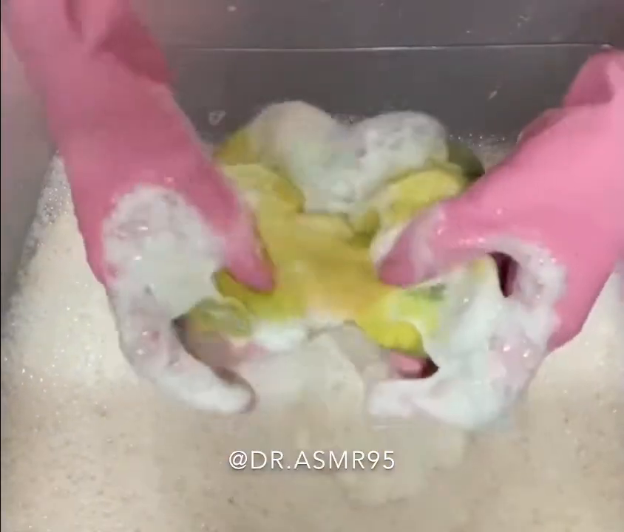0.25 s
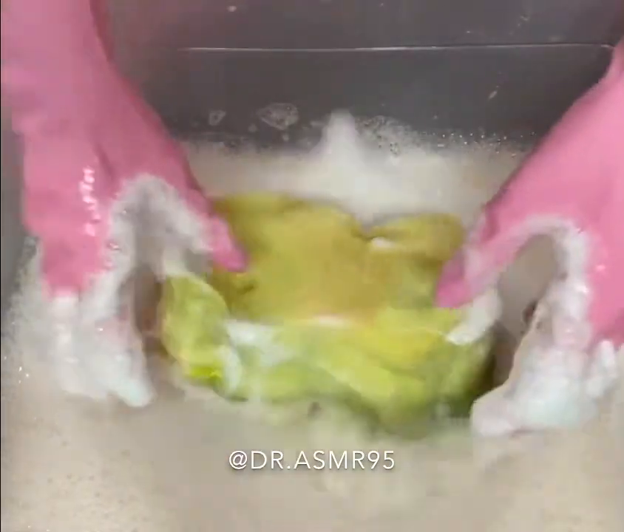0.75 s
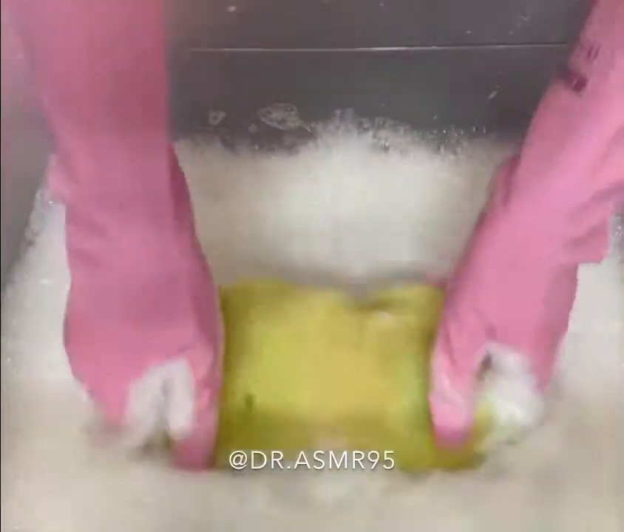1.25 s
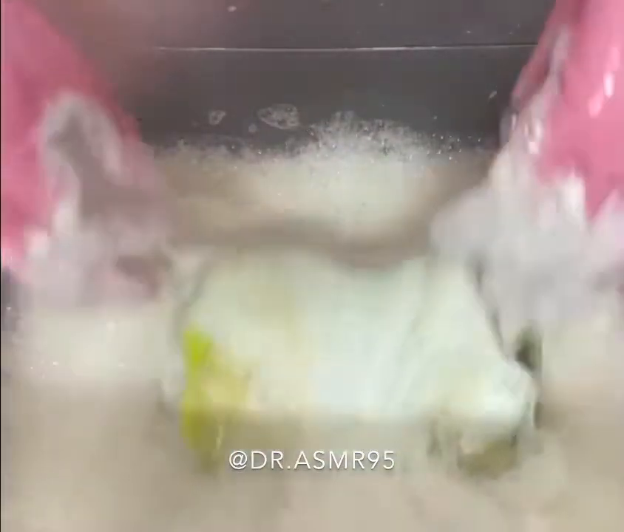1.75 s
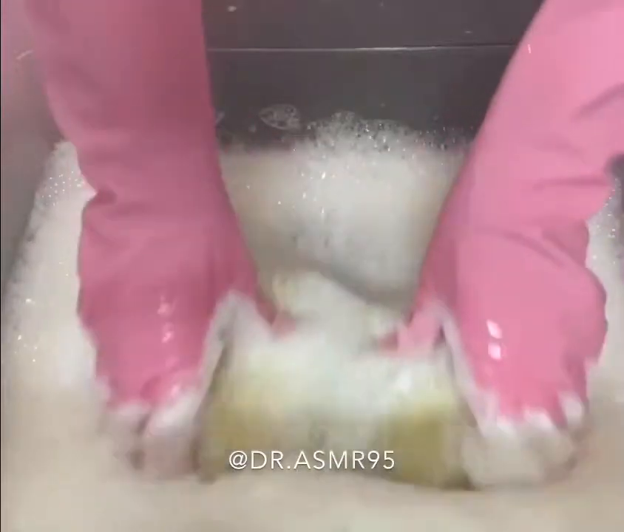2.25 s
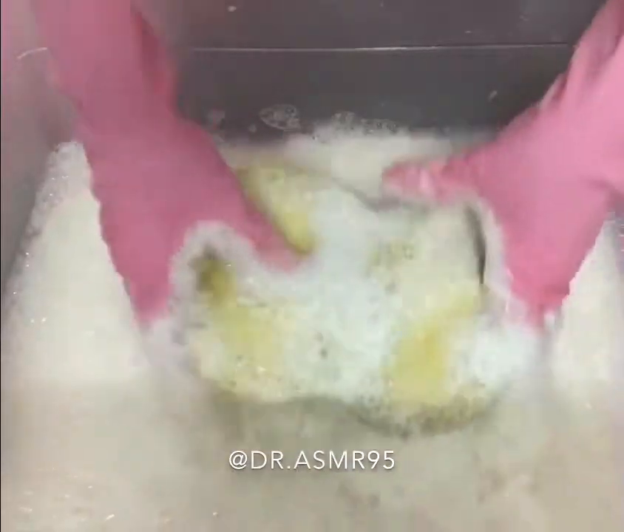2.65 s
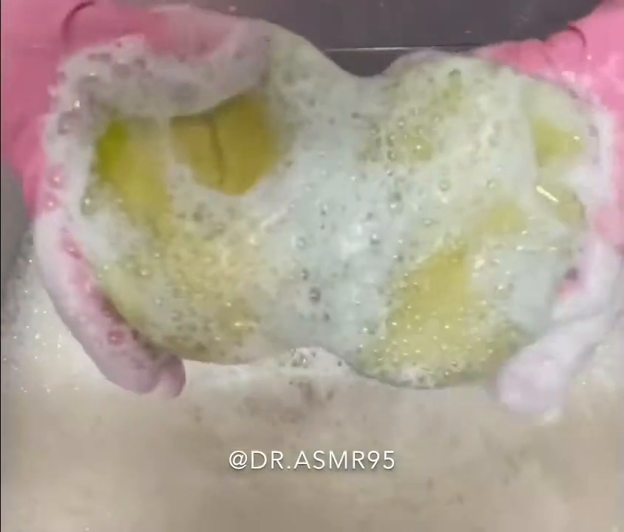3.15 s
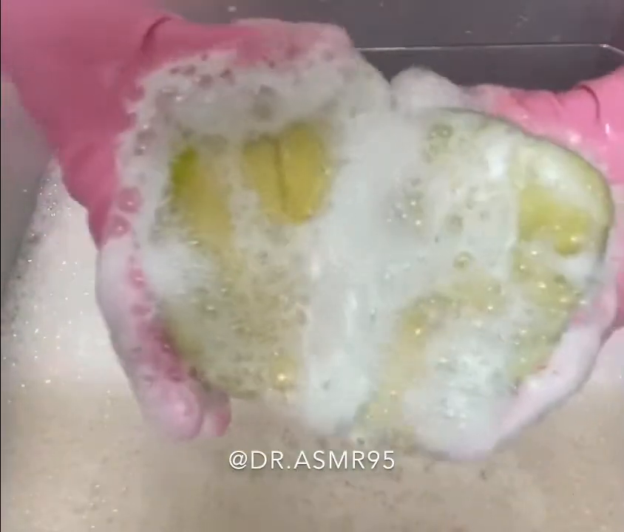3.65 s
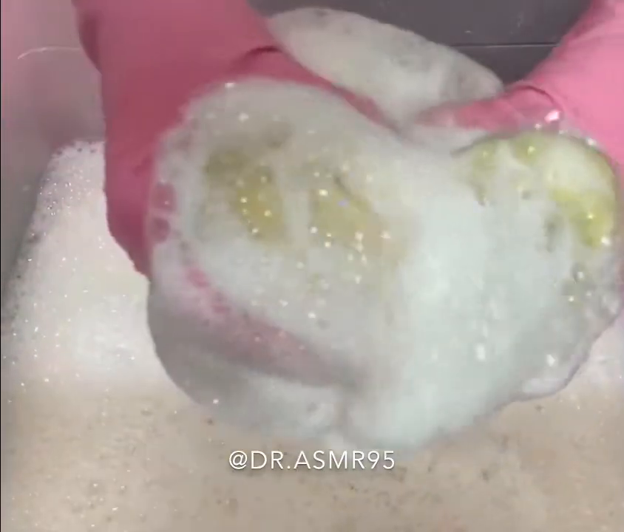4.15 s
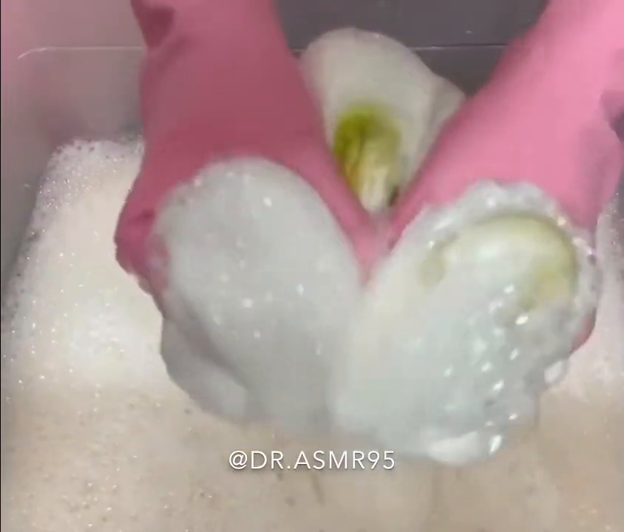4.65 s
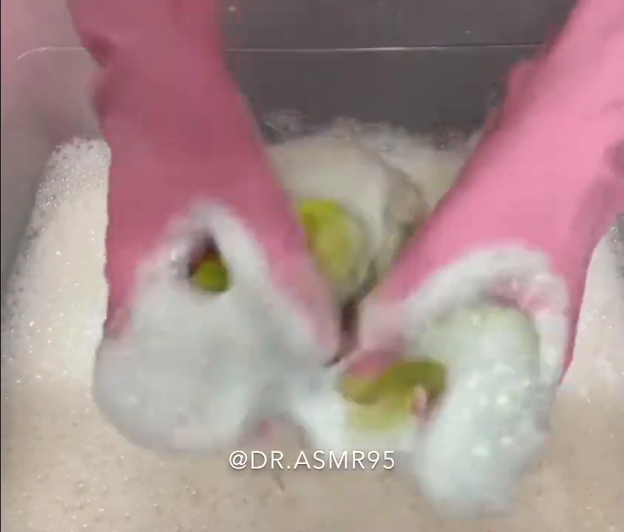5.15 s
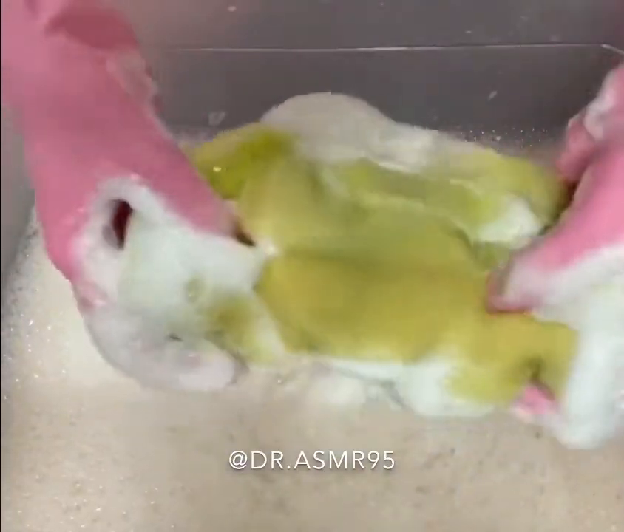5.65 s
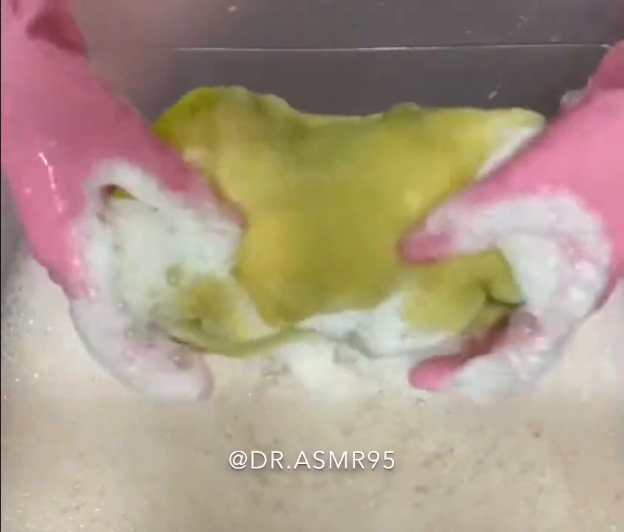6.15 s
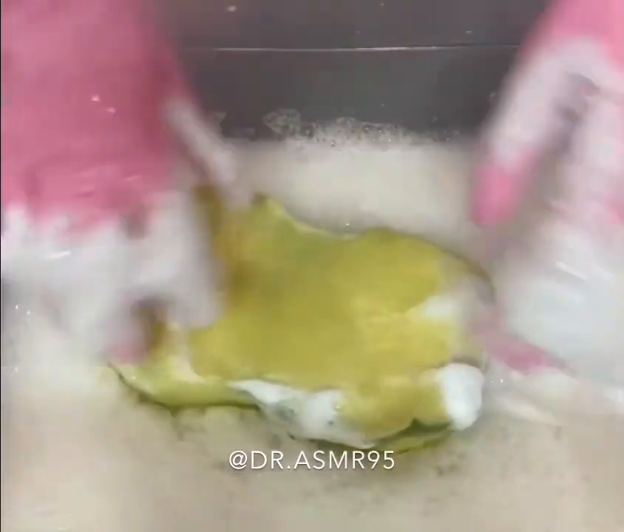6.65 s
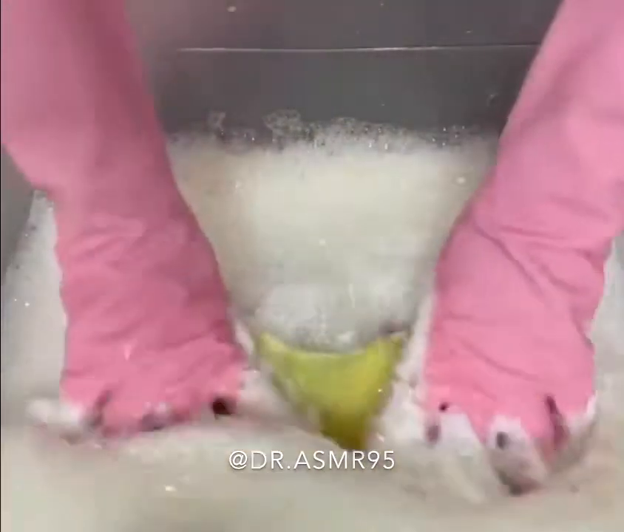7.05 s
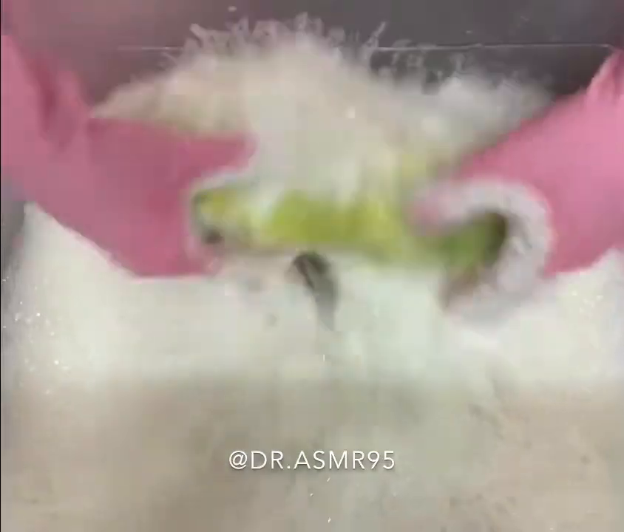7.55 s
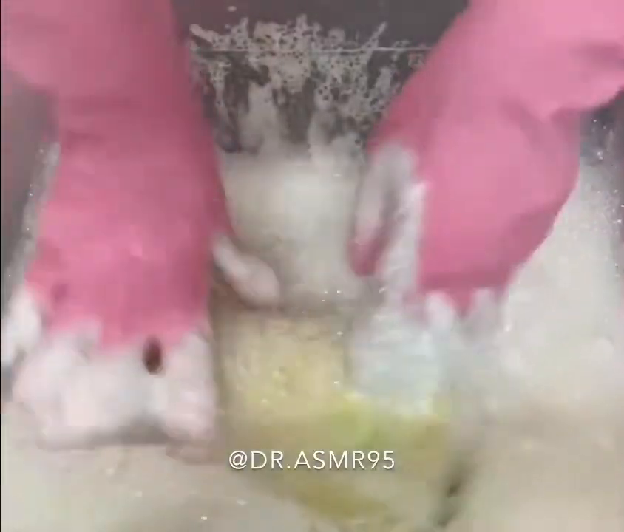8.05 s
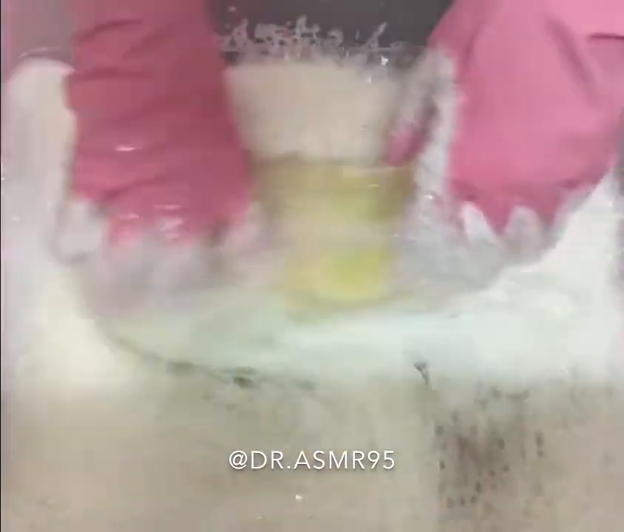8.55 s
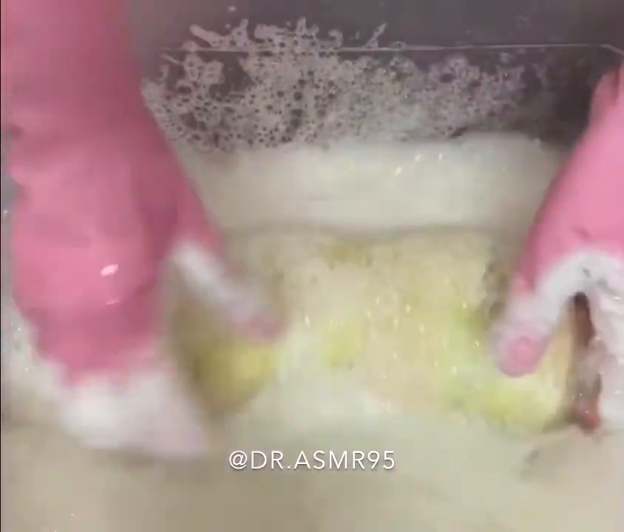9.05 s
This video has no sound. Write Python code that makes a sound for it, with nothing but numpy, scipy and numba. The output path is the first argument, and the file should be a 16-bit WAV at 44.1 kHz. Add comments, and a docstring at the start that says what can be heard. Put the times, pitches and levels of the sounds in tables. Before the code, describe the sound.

Very close stereo sound of a soapy sponge handled by rubber gloves in a small basin of foamy water, with short hard echoes and a faint low hum and hiss. From 0 to 0.7 s, bright fizzy presses and sloshing, with a burst of hollow blubs at about 0.5. From 1 to 3 s it is quieter: soft fizz, a fuller splash near 1.9, a faint rubber chirp at 2.4. From 3.1 the lather crackles coarsely with snapping films, swelling strongest around 3.8. From 4.2 to 4.7 trapped air sputters in a rapid buzzing flutter with low blubs. At 4.8 to 4.95 loud wet squirts slap out. Fizzy squeezes return at 5.4, 5.6 and 6.1, a deep gulping plop at 6.8, a splashy press at 7.2. From 7.5 to 9.3, softer sloshes, small blubs and sparse crackle.

```python
"""A soapy sponge is squeezed by gloved hands: lather crackles out of its pores as swarms of tiny ringing bubbles.
The hands push it around a sink of foamy water, close to the microphone; larger bubbles make the slosh.
Air pockets blub on falling notes, films snap as short noise bursts and wet gaps squirt as falling chirps.
In the hardest squeeze trapped air sputters out in a train of squirts over a drone.
Behind it lie the basin's short echoes and a room of filtered noise and low, wavering hum."""
import sys
import numpy as np
from scipy import signal
from scipy.fft import rfft, irfft, next_fast_len
from scipy.io import wavfile
from scipy.ndimage import uniform_filter1d
from numba import njit

SR = 44100
rng = np.random.default_rng(int(sys.argv[2]) if len(sys.argv) > 2 else 0)


def unload_wav(signal):
    """Save mono or channel-first audio to the path in sys.argv[1] as 16-bit WAV at rate SR, clipped to [-1, 1]."""
    wavfile.write(
        sys.argv[1],
        SR,
        np.round(np.clip(np.atleast_2d(signal).T, -1, 1) * 32767).astype(np.int16),
    )


N = 410130
TIME = np.arange(N) / SR
CLOCK = np.arange(0, N / SR + .002, .002)  # coarser time grid for the hand movements, s
FFT_SIZE = next_fast_len(N + 4096)
FREQ = np.fft.rfftfreq(FFT_SIZE, 1 / SR)
SLOSH_WIDTH, FOAM_WIDTH = .35, .4  # stereo spread of stirred water and of lather, 0-1


def amp(db):
    """Decibels to gain."""
    return 10 ** (np.asarray(db) / 20)


def evened(x):
    """Scales to rms 1."""
    return x / np.sqrt(np.mean(x ** 2) + 1e-20)


def shape(points):
    """Gain at every frequency, drawn through (frequency [Hz], level [dB]) points on a log axis."""
    hz, db = np.transpose(points)
    return amp(np.interp(np.log(FREQ + 1), np.log(hz + 1), db))


def filtered(x, response):
    """Applies a frequency response."""
    return irfft(rfft(x, FFT_SIZE) * response, FFT_SIZE)[..., :N]


def add(mix, s, sound):
    """Adds a sound into the mix at time s."""
    part = mix[..., max(round(s * SR), 0):][..., :sound.shape[-1]]
    part += sound[..., :part.shape[-1]]


def wander(size, per_s):
    """Random drift of rms 1, heading for a new value per_s times a second."""
    return evened(np.interp(np.arange(size) * per_s / SR, np.arange(size), rng.standard_normal(size)))


def band(x, hz, ratio):
    """A broad resonance from hz / ratio to hz * ratio."""
    b, a = signal.butter(1, [hz / ratio, hz * ratio], "band", fs=SR)
    return signal.lfilter(b, a, x)


def noise_burst(size, hz, ratio):
    """Noise of rms 1 through two equal resonances in a row."""
    return evened(band(band(rng.standard_normal(size), hz, ratio), hz, ratio))


@njit
def ring(out, start, hz, cycles, size, glide, pan):
    """Sums bubbles: each a sine that swells fast and dies, and whose pitch slides as it rings."""
    for k in range(len(start)):
        life = cycles[k] * SR / hz[k]
        for i in range(min(int(5 * life), out.shape[1] - start[k])):
            u = i / life
            swell = np.exp(-u) * np.tanh(2 * u)
            turns = cycles[k] * u * (1 + glide[k] * u)
            v = size[k] * swell * np.sin(2 * np.pi * turns)
            out[0, start[k] + i] += v * (1 + pan[k])
            out[1, start[k] + i] += v * (1 - pan[k])
    return out


def bubbles(colour, low_hz, high_hz, cycles, spread_db, clump_db, clumps_per_s, glide, width, count):
    """A swarm of bubbles of about rms 1: many small, a few large, bursting in clumps."""
    when, pitch, life, size, slide, side = rng.random((count, 6)).T
    start = (when * N).astype(np.int64)
    hz = low_hz * (high_hz / low_hz) ** pitch
    size_db = spread_db * np.minimum(-np.log(1 - size), 4)
    size_db += clump_db * wander(N, clumps_per_s)[start]
    gain = amp(size_db) * hz / low_hz
    pan = width * (2 * side - 1)
    swarm = ring(np.zeros((2, N)), start, hz, cycles * (.5 + life), gain, glide * slide, pan)
    swarm = filtered(swarm, shape(colour))
    # the hands set how much air escapes and the bubbles share it, so slow level changes are evened out
    power = uniform_filter1d(uniform_filter1d((swarm ** 2).mean(0), size=1800), size=1800)
    return swarm / np.sqrt(abs(power) + 1e-12)


def pops(drive, low_hz, high_hz, cycles, rise, spread_db, count):
    """Single bubbles that stand out of the swarm: each rings longer, and its note rises as it surfaces."""
    when, pitch, life, size, side = rng.random((count, 5)).T
    start = (when * N).astype(np.int64)
    hz = low_hz * (high_hz / low_hz) ** pitch
    gain = drive[start] * amp(spread_db * np.minimum(-np.log(1 - size), 3))
    pan = SLOSH_WIDTH * (2 * side - 1)
    return ring(np.zeros((2, N)), start, hz, cycles * (.5 + life), gain, rise * life, pan)


def movements(table, rounding):
    """Swells each movement to its peak and away; returns level, colour and dB below the peak over time."""
    s, rise, fall, db, colour = np.transpose(table)[..., None]
    # rise and fall are the times to change by 10 dB; a greater rounding flattens the top
    below_db = 10 * np.maximum((s - CLOCK) / rise, (CLOCK - s) / fall) ** rounding
    return db - below_db, colour, below_db


def together(db, resting_db):
    """Gain over time of overlapping movements: their powers add to the resting level."""
    power = (amp(db) ** 2).sum(0) + amp(resting_db) ** 2
    return np.interp(TIME, CLOCK, np.sqrt(power))


# colour of the room's steady noise: (frequency [Hz], level [dB])
ROOM_COLOUR = [(20, -28), (35, -3), (55, 12.5), (80, 11), (115, 14), (170, -0.5), (300, -21), (700, -42),
               (1800, -17), (4000, -17), (8000, -17.5), (16000, -19.5)]
# partials of the room's hum: (frequency [Hz], rms level [dB])
HUM_PARTIALS = [(58, -51), (116, -55.5)]


def room(noise_db=-50, apart=0.028):
    """Low rumble and faint hiss, nearly alike on both sides, under a hum whose phase wavers."""
    noise = rng.standard_normal(N) + apart * rng.standard_normal((2, N))
    hum = np.zeros(N)
    for hz, db in HUM_PARTIALS:
        hum += amp(db) * np.sqrt(2) * np.sin(2 * np.pi * hz * TIME + 0.68 * wander(N, 5))
    return amp(noise_db) * evened(filtered(noise, shape(ROOM_COLOUR))) + hum


# colour of the basin's echoes: (frequency [Hz], level [dB])
ECHO_COLOUR = [(80, -16), (250, -12), (600, -6.5), (1400, -12), (3000, -9), (6000, -13), (16000, -16)]


def sink(x, t60=0.089):
    """The basin walls throw back a short scatter of echoes, different on each side, gone 60 dB in t60 s."""
    t = np.arange(SR // 4) / SR
    struck = rng.random((2, len(t))) < .08
    taps = rng.standard_normal((2, len(t))) * struck * (t > .002) * amp(-60 * t / t60)
    taps /= np.linalg.norm(taps, axis=1, keepdims=True)
    echoes = signal.fftconvolve(x, taps, axes=1)[:, :N]
    return x + filtered(echoes, shape(ECHO_COLOUR))


# strokes through the water: (peak time [s], rise [s per 10 dB], fall [s per 10 dB],
# splash drive [dB], heave drive relative to splash drive [dB])
WATER_STROKES = [(.02, 0.13, 0.085, -35, -9.5), (.41, 0.22, 0.13, -36, -17), (.54, 0.046, 0.036, -35, -1.5),
                 (.94, 0.1, 0.15, -38.5, -5.5), (1.135, 0.04, 0.14, -39.5, -9.5),
                 (1.53, 0.24, 0.091, -38.5, -7.5), (1.885, 0.054, 0.08, -32, -7.5),
                 (1.96, 0.082, 0.23, -48.5, 4), (2.38, 0.28, 0.24, -44.5, -1.5),
                 (2.56, 0.22, 0.27, -42, -13), (2.82, 0.048, 0.2, -50, -1.5),
                 (3.08, 0.13, 0.15, -45.5, -7.5), (3.49, 0.26, 0.058, -43.5, -3.5),
                 (3.93, 0.24, 0.14, -32, -9.5), (4.26, 0.068, 0.23, -33.5, 0), (4.6, 0.1, .045, -31.5, -5),
                 (4.777, 0.0067, .04, -36, -10), (4.835, 0.035, 0.023, -31.5, -1.5),
                 (4.91, 0.06, 0.087, -28, -6.5), (5.4, 0.072, 0.093, -34, -12),
                 (5.62, 0.068, 0.15, -36, -4.5), (5.945, 0.2, 0.076, -39.5, -11),
                 (6.11, 0.02, 0.09, -31, -25), (6.26, 0.06, 0.025, -37.5, 0.5),
                 (6.585, 0.044, 0.065, -43.5, -1.5), (6.69, 0.041, 0.14, -34.5, -12),
                 (6.835, 0.092, 0.086, -34.5, -0.5), (7.0, 0.31, 0.2, -38, -14),
                 (7.21, 0.037, 0.11, -30, -8), (7.44, 0.15, 0.095, -33, -7), (7.73, 0.044, 0.1, -41, -5.5),
                 (8.17, 0.16, 0.1, -41, -4.5), (8.33, 0.067, 0.11, -38.5, -7),
                 (8.42, 0.088, 0.029, -41, -3), (8.73, 0.072, 0.052, -44, 3.5),
                 (9.03, 0.068, 0.059, -35.5, -1), (9.29, 0.13, 0.056, -41, -5)]


def stirring(rounding=1.08, ripple_db=-61):
    """How hard the strokes drive splash and heave, down to the ripple of water left alone."""
    db, depth, _ = movements(WATER_STROKES, rounding)
    return together(db, ripple_db), together(db + depth, ripple_db)


# colour of the splash bubbles: (frequency [Hz], level [dB])
SPLASH_COLOUR = [(100, -6), (200, -3.5), (350, 3), (500, -1), (650, -3.5), (800, -1.5), (1100, -12),
                 (1800, 0.5), (4000, -43)]
# colour of the deep heave bubbles: (frequency [Hz], level [dB])
HEAVE_COLOUR = [(30, -2), (70, 0), (110, -1), (180, -5.5), (260, -1.5), (500, -19)]


def water(splashing, heaving):
    """Larger bubbles open in the stirred water over the slow heave of the sponge."""
    splash = bubbles(SPLASH_COLOUR, 198.7, 1448, cycles=2.67, spread_db=1.5, clump_db=-0.5,
                     clumps_per_s=26, glide=-0.023, width=SLOSH_WIDTH, count=7500)
    heave = bubbles(HEAVE_COLOUR, 73.8, 258, cycles=1.09, spread_db=1.0, clump_db=-5.0,
                    clumps_per_s=21, glide=-0.0056, width=0.59, count=1200)
    return splash * splashing + amp(4.0) * heave * heaving


# air pockets opening: (time [s], level [dB], pitch at the top of the swell [Hz], swell time [s])
AIR_POCKETS = [(.514, -17, 830, 0.0048), (.520, -10.5, 664, 0.0021), (.523, -9.5, 298, 0.0024),
               (.526, -13, 540, 0.0039), (.536, -10, 308, 0.0025), (.557, -27, 420, 0.0029),
               (.908, -33, 519, 0.0083), (0.927, -24, 324, .0045), (.945, -25, 94, .013),
               (.972, -34, 560, .0025), (1.15, -34, 720, 0.0032), (1.52, -27.5, 850, 0.0027),
               (1.559, -30, 680, .003), (1.577, -31, 750, 0.0032), (1.715, -31, 340, 0.0039),
               (1.862, -24.5, 306, 0.0043), (2.134, -19, 268, 0.0031), (4.522, -22, 205, .0065),
               (4.55, -22, 750, 0.002), (4.569, -19, 362, 0.0049), (4.591, -14.5, 285, 0.0041),
               (4.61, -21, 798, .002), (4.615, -13, 238, .0052), (4.655, -12.5, 244.5, 0.0048),
               (4.803, -21.5, 620, 0.0018), (4.847, -17, 225, .0045), (5.783, -25.5, 1830, 0.0012),
               (5.811, -23.5, 1480, 0.0012), (6.081, -29, 890, .0026), (6.105, -23, 716, 0.0026),
               (6.226, -18, 410, 0.0036), (6.235, -23.5, 760, 0.0067), (6.243, -19.5, 306, 0.004),
               (6.277, -30.5, 170, 0.0066), (6.259, -26, 443, 0.0021), (6.3, -32, 397, 0.0035),
               (6.676, -31.5, 815, 0.0017), (6.785, -10.5, 199, .0044), (6.805, -18, 111, 0.012),
               (6.824, -18, 93, .0065), (6.856, -28, 80, .011), (6.882, -21.5, 796, 0.0034),
               (7.188, -23.5, 844, 0.0016), (7.424, -27, 482, 0.0085), (7.714, -31.5, 840, 0.0052),
               (7.73, -23, 300, 0.004), (8.319, -32, 794, 0.004), (8.75, -37.5, 854, 0.0038),
               (9.002, -25, 200, 0.0034), (9.016, -34, 393, .0041), (9.046, -25.5, 375, 0.0054)]


def blubs(fall=0.5, wobble=0.12, spatter_db=-15):
    """An air pocket swells open, so its note falls; its ragged rim spatters as noise around the note."""
    out, t = np.zeros(N), np.arange(SR // 10) / SR
    for s, db, pitch_hz, swell in AIR_POCKETS:
        u = t / swell
        note = pitch_hz * (1 + fall * (np.exp(-u) - np.exp(-1)))
        hz = note * (1 + wobble * wander(len(t), 813))
        tone = np.sin(2 * np.pi * np.cumsum(hz) / SR)
        spatter = noise_burst(len(t), note[0], 1.8)
        add(out, s, amp(db) * (u * np.exp(1 - u)) ** 1.85 * (tone + amp(spatter_db) * spatter))
    return out


# wet films snapping: (time [s], level before the shared trim [dB], pitch [Hz])
FILM_SNAPS = [(0.012, -23, 1900), (.432, -19, 9000), (.455, -22, 2020), (.519, -20.5, 1800),
              (.974, -34, 2200), (1.779, -30, 1000), (2.235, -29.5, 2060), (2.242, -32, 1900),
              (2.893, -34, 1880), (2.961, -35, 1640), (3.068, -27, 5100), (3.145, -28, 1240),
              (3.186, -26, 1680), (3.413, -24, 1900), (3.458, -24, 1750), (3.472, -21, 1680),
              (3.552, -24.5, 1830), (3.64, -22, 1130), (3.773, -29, 1330), (3.815, -22, 1670),
              (4.102, -29, 1970), (4.825, -31, 2700), (4.832, -18.5, 2000), (4.867, -21, 7000),
              (5.103, -29.5, 8500), (5.662, -22, 2460), (5.748, -29, 3460), (6.103, -23, 3200),
              (6.476, -37, 2800), (6.517, -33, 3000), (6.804, -21, 1960), (7.187, -27, 1490),
              (7.966, -40, 1940), (8.318, -34, 1190), (8.658, -28.5, 1540), (8.961, -29, 1400),
              (9.045, -28.5, 1060)]


def snaps(decay=0.0058, trim_db=-4):
    """A soap film tears between glove and sponge: a noise burst that dies in a few milliseconds."""
    out, t = np.zeros(N), np.arange(SR // 25) / SR
    for s, db, hz in FILM_SNAPS:
        tear = noise_burst(len(t), hz, 2.2)
        add(out, s, amp(db + trim_db) * tear * np.exp(-t / decay))
    return out


# a rubber finger slipping: (time [s], pitch [Hz], level [dB])
FINGER_SLIP = [(2.334, 3120, -56), (2.355, 2970, -36), (2.385, 2800, -43), (2.407, 3030, -41),
               (2.422, 3170, -60)]


def squeak(overtone_db=-13, ragged=.11, waver_db=5.1):
    """Wet rubber sticks and slips in a short, ragged chirp with one overtone."""
    s, hz, db = np.transpose(FINGER_SLIP)
    t = np.arange(s[0], s[-1], 1 / SR)
    pitch = np.interp(t, s, hz) * (1 + ragged * wander(len(t), 1520))
    phase = 2 * np.pi * np.cumsum(pitch) / SR
    level = amp(np.interp(t, s, db) + waver_db * wander(len(t), 189))
    out = np.zeros(N)
    add(out, s[0], level * (np.sin(phase) + amp(overtone_db) * np.sin(2 * phase)))
    return out


def squirt(hz, swell, fall=0.65):
    """Air forced through a closing wet gap: a chirp whose log pitch drops by fall in each swell time."""
    u = np.arange(SR // 25) / SR / swell
    turns = hz * swell * np.exp(fall) * (1 - np.exp(-fall * u)) / fall  # passes hz at the peak, u = 1
    return (u * np.exp(1 - u)) ** 2 * np.sin(2 * np.pi * turns)


# single squirts between the fingers: (time [s], level [dB], pitch at the peak [Hz], swell time [s])
FINGER_SQUIRTS = [(2.18, -36.5, 1800, 0.0019), (4.8428, -10.5, 1850, 0.0016), (4.8717, -4, 1700, 0.00083),
                  (4.8855, -20, 850, 0.0011), (4.9147, -18, 1400, 0.00055), (4.9238, -11, 1210, 0.0016),
                  (4.938, -23, 1500, 0.00079), (4.949, -21, 1400, 0.00062), (6.102, -18, 1500, 0.0011),
                  (6.8045, -19.5, 805, 0.0017), (8.66, -29, 427, 0.0048)]


def squirts():
    """The separate wet slaps as the grip shifts."""
    out = np.zeros(N)
    for s, db, hz, swell in FINGER_SQUIRTS:
        add(out, s, amp(db) * squirt(hz, swell))
    return out


# air fluttering out of the sponge: (time [s], puff rate [1/s], drone level [dB], squirt level [dB])
FLUTTER = [(4.2348, 114, -38, -17), (4.262, 111, -27, -26), (4.309, 114, -25.5, -17),
           (4.351, 115, -22, -21.5), (4.371, 129, -24, -25), (4.399, 117, -26.5, -17.5),
           (4.444, 111, -34.5, -22.5), (4.49, 108, -30, -20.5), (4.512, 100, -38, -30.5),
           (4.56, 112, -32, -30), (4.6, 118, -29, -30), (4.655, 105, -26, -29), (4.675, 89, -47, -50)]
# resonance of the air space under the gloves: (frequency [Hz], level [dB])
GLOVE_CAVITY = [(70, -14), (115, -5), (160, -6), (220, 0), (260, -1.5), (330, -11), (460, -19), (620, -24)]


def sputter(squirt_hz=1340, swell=0.00143):
    """A wet flap puffs squirts, higher when it beats fast, and drones the cavity; returns sound, airflow."""
    jitter, scatter = .012, .06  # unevenness as a share of the puff rate and of the squirt pitch
    uneven_db, waver_db = 1.4, 1.1  # level from puff to puff, and waver of the drone's partials
    s, *columns = np.transpose(FLUTTER)
    t = np.arange(s[0], s[-1], 1 / SR)
    rate, drone_db, squirt_db = (np.interp(t, s, c) for c in columns)
    turns = np.cumsum(rate * (1 + jitter * wander(len(t), 120))) / SR

    drone = np.zeros(len(t))
    for k in range(1, 6):
        partial_db = np.interp(k * rate, *np.transpose(GLOVE_CAVITY)) + waver_db * wander(len(t), 111.0)
        drone += amp(partial_db) * np.cos(2 * np.pi * k * turns)
    out, airflow = np.zeros(N), np.ones(N)
    add(out, s[0], amp(drone_db) * evened(drone))

    puffs = np.flatnonzero(np.diff(np.floor(turns)))
    for i, (size, pitch) in zip(puffs, rng.standard_normal((len(puffs), 2))):
        hz = squirt_hz * rate[i] / rate.max() * np.exp(scatter * pitch)
        add(out, t[i], amp(squirt_db[i] + uneven_db * size) * squirt(hz, swell))

    # the flap opens at once and closes gradually within each beat
    opening = evened(.4 + np.exp(-(turns % 1) / .18))
    add(airflow, s[0], (opening - 1) * signal.windows.tukey(len(t), .25))
    return out, airflow


def ticks(lather, per_s=140, spread_db=4.3, gain_db=21):
    """Large cells of the lather break with bright ticks at random, scattered across the sponge."""
    size = (rng.random(N) < per_s / SR) * amp(spread_db * np.minimum(rng.exponential(1, N), 2))
    side = FOAM_WIDTH * (2 * rng.random(N) - 1)
    clicks = size * np.array([1 + side, 1 - side])
    return amp(gain_db) * band(clicks, 2100, 1.39) * lather


# short presses on the sponge: (peak time [s], rise [s per 10 dB], fall [s per 10 dB],
# drive [dB], fineness of the foam at the peak [dB])
SPONGE_PRESSES = [(.04, 0.026, 0.073, -33, 16.5), (.165, 0.12, 0.11, -30, 12.5),
                  (.43, 0.14, 0.087, -33, 10.5), (.93, 0.22, 0.059, -49, 9), (1.12, 0.12, 0.031, -50, 10),
                  (1.25, 0.065, 0.056, -40, 12), (1.48, 0.15, 0.11, -44.5, -1),
                  (1.89, 0.092, 0.04677, -46.5, -8), (2.38, 0.19, 0.035, -49, 1),
                  (2.48, 0.049, 0.16, -44, 2.5), (2.645, 0.027, 0.022, -44, -11),
                  (2.86, 0.07, 0.043, -47.5, -15), (2.966, .005, 0.22, -56.5, -27),
                  (4.83, 0.027, 0.054, -30.5, 0), (4.875, 0.025, 0.089, -27, 10),
                  (4.925, 0.06, 0.1, -30, 3), (5.1, 0.19, 0.21, -42, 3.5), (5.39, 0.12, 0.092, -27, 10.5),
                  (5.62, 0.13, 0.041, -31.5, 12), (5.75, 0.093, 0.013, -40.5, -2),
                  (5.94, 0.22, 0.079, -36, 6), (6.11, 0.017, 0.16, -35.5, 5),
                  (6.18, 0.085, 0.041, -35.5, 12.5), (6.54, 0.073, 0.049, -45.5, 7),
                  (6.64, 0.021, 0.022, -43.5, 13.5), (6.82, 0.16, 0.14, -45.5, 0),
                  (6.98, 0.043, 0.12, -43.5, -4), (7.2, 0.026, 0.1, -36.5, -0.5),
                  (7.33, 0.05046, 0.062, -40.5, 0), (7.42, 0.036, 0.15, -41.5, 0),
                  (7.56, 0.15, 0.03, -46, 4.5), (8.155, 0.052, .05, -55.5, -11),
                  (8.33, 0.077, 0.079, -54, 12), (8.68, 0.037, 0.19, -54, 3),
                  (8.96, 0.091, 0.046, -50.5, 1), (9.17, 0.04, 0.11, -49.5, -5)]
# the one long, hard squeeze: (time [s], drive [dB], fineness of the foam [dB])
HARD_SQUEEZE = [(3.11, -65, -11), (3.17, -41.5, -4), (3.245, -38.5, 2), (3.267, -31, 6.5),
                (3.38, -39.5, -5), (3.47, -36, -1.5), (3.56, -37.5, -4), (3.72, -28.5, 1.5), (3.8, -29, 3),
                (3.83, -24, 5), (3.88, -28, 6), (3.98, -28, 4.5), (4.04, -34, -2.5), (4.29, -35, 1),
                (4.375, -37, 11), (4.46, -46.5, -12), (4.67, -52.5, -29), (4.73, -62, -6)]


def squeezing(rounding=1.43, sag=0.23):
    """How hard the hands drive froth, lather and fizz; the foam coarsens by sag dB per dB a press eases."""
    froth_db, fizz_db = 0.3, -10  # balance against the lather at fineness 0
    froth_loss = 0.45  # froth lost, dB per dB of fineness; fizz gains 1 dB per dB
    resting_db = (-61, -69, -64)  # drive of froth, lather and fizz in foam left alone
    db, fineness, eased_db = movements(SPONGE_PRESSES, rounding)
    s, wring_db, wring_fineness = np.transpose(HARD_SQUEEZE)
    db = np.vstack([db, np.interp(CLOCK, s, wring_db, -np.inf, -np.inf)])
    fineness = np.vstack([fineness - sag * eased_db, np.interp(CLOCK, s, wring_fineness)])
    sizes = db + froth_db - froth_loss * fineness, db, db + fizz_db + fineness
    return [together(size, rest) for size, rest in zip(sizes, resting_db)]


# colour of the coarse froth: (frequency [Hz], level [dB])
FROTH_COLOUR = [(300, -40), (700, 0), (1100, 0), (1500, 3), (2100, .5), (2800, -10.5), (4000, -2.5),
                (8000, -82)]
# colour of the medium lather: (frequency [Hz], level [dB])
LATHER_COLOUR = [(1200, 9.5), (2400, 1.5), (3200, 6), (4500, -16), (6000, -5), (7700, -6), (10000, -65),
                 (16000, -45)]
# colour of the fine fizz: (frequency [Hz], level [dB])
FIZZ_COLOUR = [(4000, 20.5), (7500, 1), (8700, -14), (11000, 5), (13000, -5.5), (16000, -2)]


def foam(coarse, medium, fine):
    """Three sizes of bubble burst as lather is pressed from the pores, each at its own gain over time."""
    froth = bubbles(FROTH_COLOUR, 709, 3910, cycles=1.59, spread_db=1, clump_db=1.5,
                    clumps_per_s=180, glide=0.035, width=0.57, count=17000)
    lather = bubbles(LATHER_COLOUR, 2197.0, 8400, cycles=1.8, spread_db=1.0, clump_db=2.0,
                     clumps_per_s=210, glide=0.0056, width=FOAM_WIDTH, count=20000)
    fizz = bubbles(FIZZ_COLOUR, 5770, 14900, cycles=2.2, spread_db=1.5, clump_db=2.5,
                   clumps_per_s=250, glide=0.0071, width=FOAM_WIDTH, count=48000)
    return froth * coarse + amp(-4.0) * lather * medium + amp(-1.65) * fizz * fine


def scene(spill_db=-10.5):
    """Everything sounds inside the basin, over the room; splashes and puffs of air stir the froth too."""
    puffs, airflow = sputter()
    coarse, medium, fine = squeezing()
    splashing, heaving = stirring()
    # splashing breaks coarse froth as well, and the froth pulses with each puff
    frothing = airflow * np.hypot(coarse, amp(spill_db) * splashing)
    suds = foam(frothing, medium, fine) + ticks(medium)
    plinks = pops(medium, 1106, 6920, cycles=10.9, rise=0.026, spread_db=4, count=1100)
    gurgles = pops(splashing, 278, 1097, cycles=5.7, rise=0.0504, spread_db=1.5, count=330)
    slosh = water(splashing, heaving) + gurgles + blubs()
    grip = squirts() + snaps() + squeak() + puffs
    return sink(suds + plinks + slosh + grip) + room()


# phase between the microphone pair: (frequency [Hz], lead of left over right [rad])
LEFT_LEAD = [(0, 0), (400, -.55), (1000, -.35), (1500, .1), (2500, 1.0), (3500, 1.6), (4700, 3.14),
             (16000, 20.1)]
# balance of the microphone pair: (frequency [Hz], left minus right [dB])
LEFT_TILT = [(100, -1.1), (350, 1.1), (600, -2.5), (1200, -0.7), (2500, -2), (3600, -1.2), (16000, -0.2)]
# treble ringing of both microphone ports: (frequency [Hz], level [dB])
PORT_RING = [(4000, 0), (4800, 3.5), (6500, -1), (7700, -2.5), (8600, 8), (10200, 2.5), (11000, -2),
             (13500, 3), (15000, .5)]


def record(dry, bass_hz=18, edge_hz=15950):
    """Two microphone ports hear the basin with a small lag, a tilt and a treble ring, within a limited band."""
    lead = np.interp(FREQ, *np.transpose(LEFT_LEAD))
    tilt = np.sqrt(shape(LEFT_TILT))  # half the difference on each side
    bass_cut = FREQ ** 4 / (FREQ ** 4 + bass_hz ** 4)
    ports = np.array([tilt, np.exp(-1j * lead) / tilt])
    pair = filtered(dry, bass_cut * shape(PORT_RING) * ports)
    lowpass = signal.firwin(511, edge_hz, window=("kaiser", 9), fs=SR)
    return signal.oaconvolve(pair, lowpass[None], "same", axes=1)


dry = scene()
out = record(dry)
unload_wav(out)
```